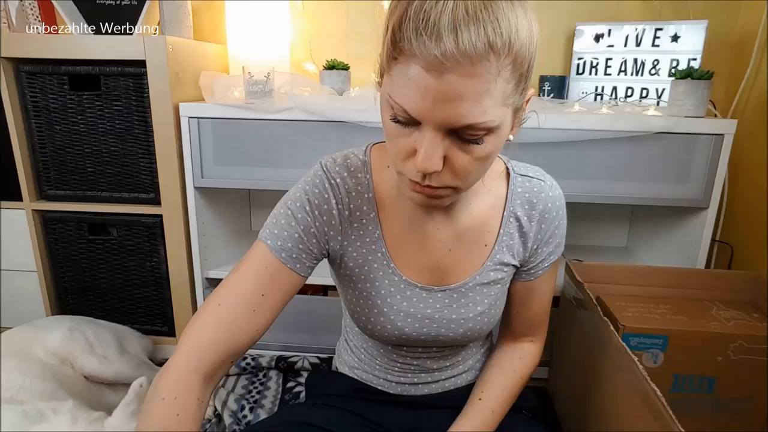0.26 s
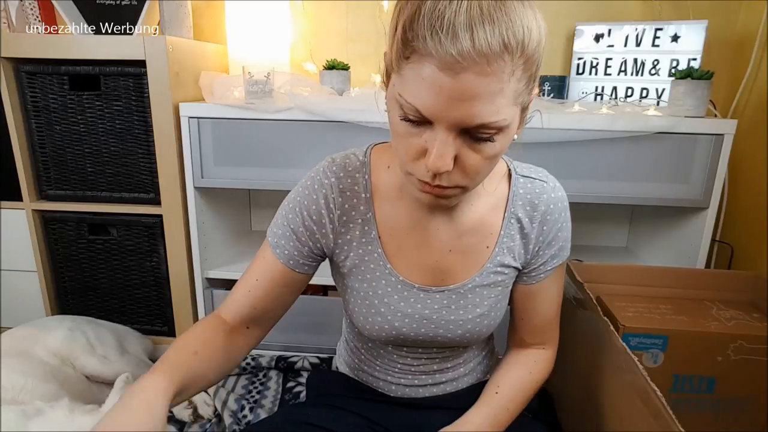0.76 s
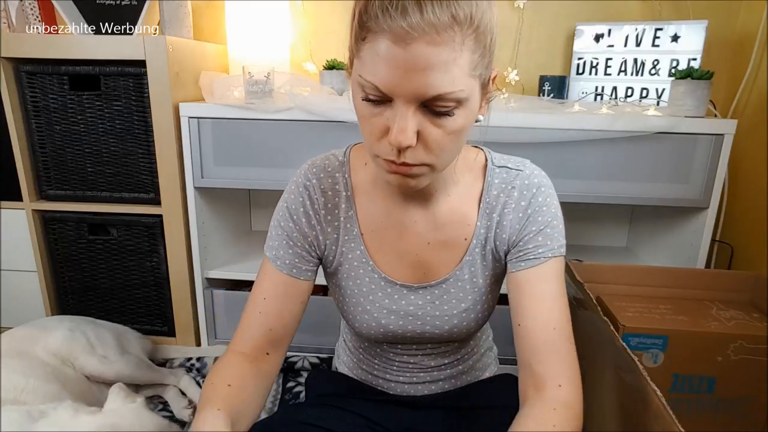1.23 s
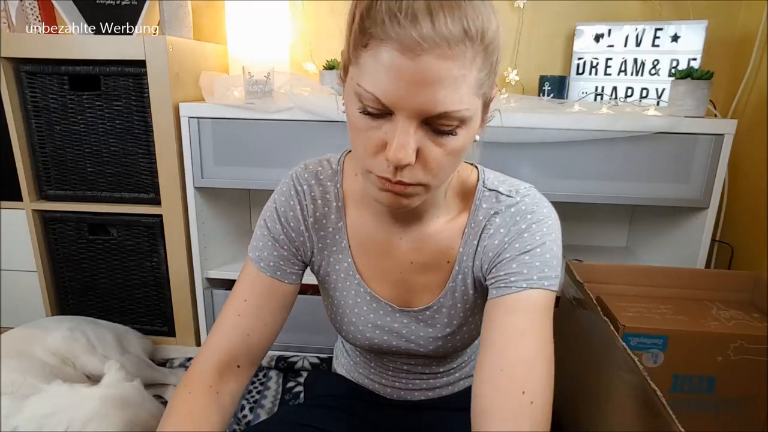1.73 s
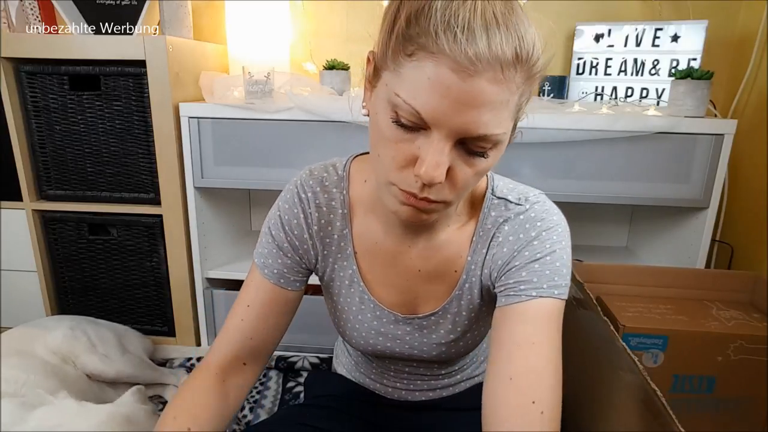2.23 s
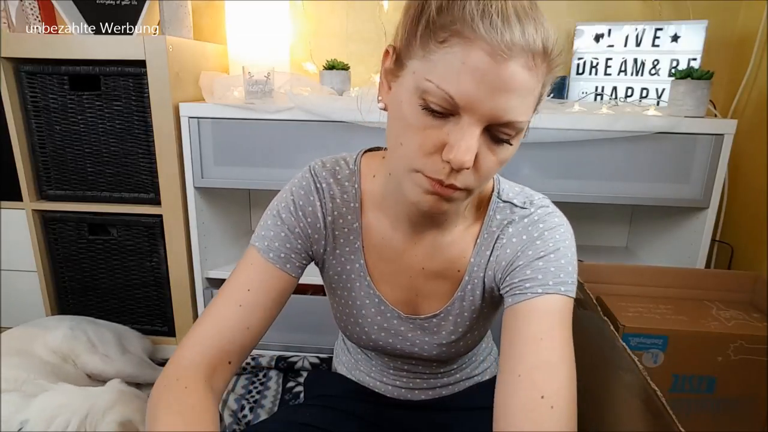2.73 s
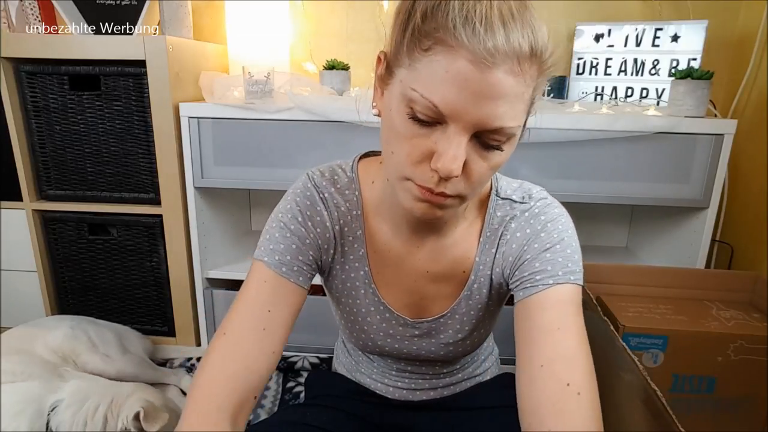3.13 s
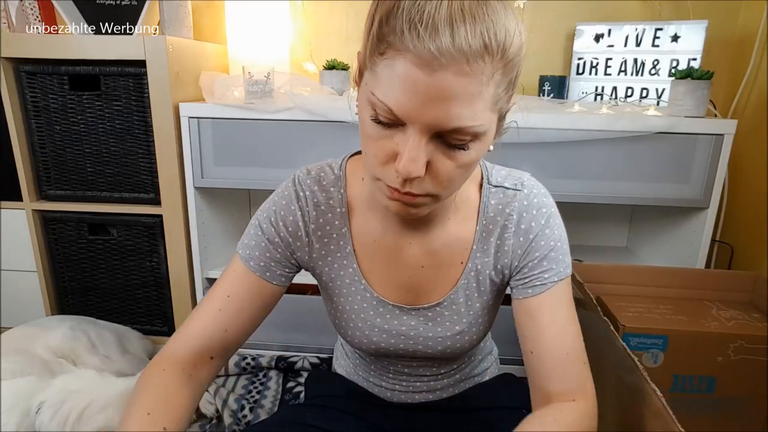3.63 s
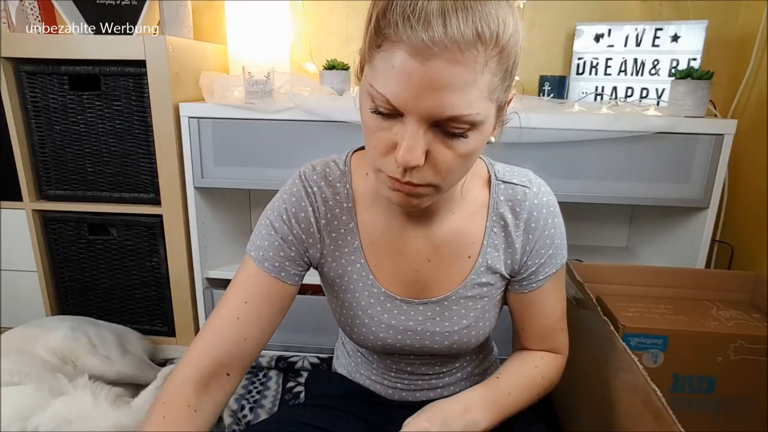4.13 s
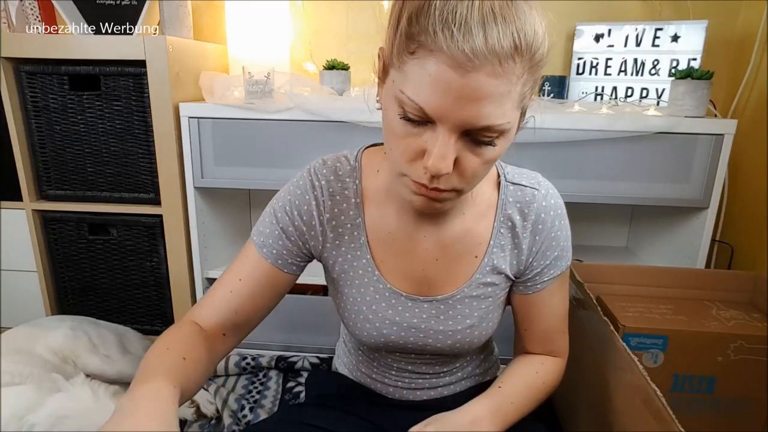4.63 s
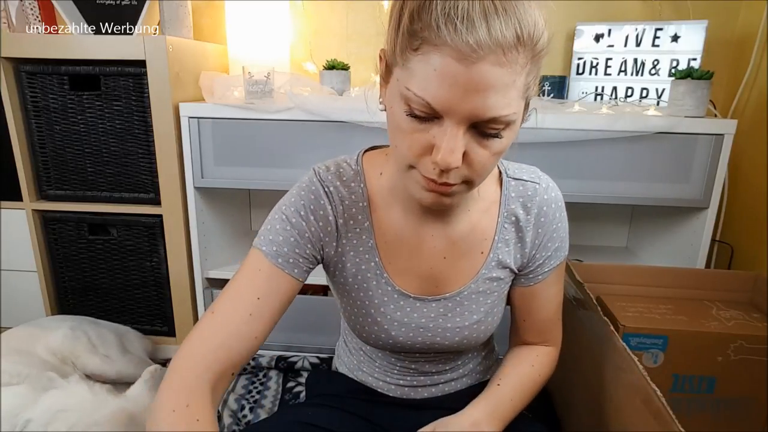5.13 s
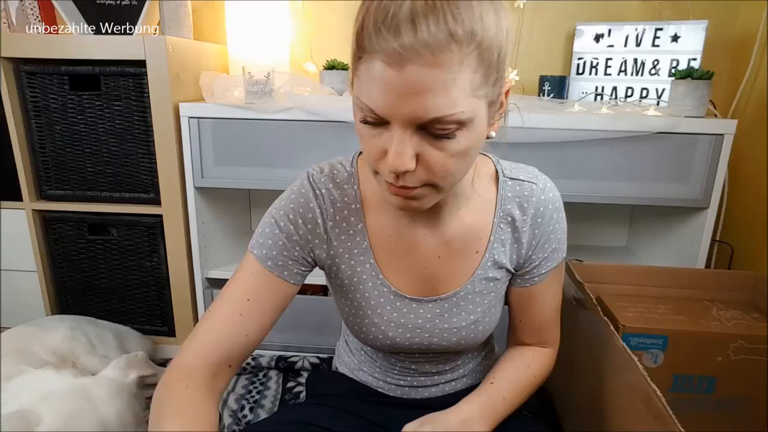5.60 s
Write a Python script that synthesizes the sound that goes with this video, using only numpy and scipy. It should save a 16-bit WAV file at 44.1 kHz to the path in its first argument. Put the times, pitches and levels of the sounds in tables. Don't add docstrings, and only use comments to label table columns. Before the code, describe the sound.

Wet little smacks and ticks give way to sharp cracks, grinding teeth and dull thuds as a dog gnaws a stiff treat.

```python
import sys
import numpy as np
from scipy import signal
from scipy.fft import rfft, irfft, next_fast_len
from scipy.io import wavfile
from scipy.ndimage import map_coordinates

SR = 44100
rng = np.random.default_rng(int(sys.argv[2]) if len(sys.argv) > 2 else 0)


def output_pcm(signal):
    pcm = np.clip(np.atleast_2d(signal).T, -1, 1) * 32767
    wavfile.write(sys.argv[1], SR, np.round(pcm).astype(np.int16))


def ratio_of_db(decibels):
    return 10 ** (np.asarray(decibels, float) / 20)


N = 258408
SPAN = 16384
LONG = next_fast_len(N + 8192)
SPAN_HZ = np.fft.rfftfreq(SPAN, 1 / SR)
LONG_HZ = np.fft.rfftfreq(LONG, 1 / SR)

# [f/Hz, width/Hz, level/dB]
JAW_MODES = [(210, 53.5, -1.5), (330, 36, 0), (390, 31, -1), (509.4, 14, -3), (571.2, 17.4, -1)]
# [f/Hz, width/Hz, level/dB]
FLOOR_MODES = [(67.6, 39.3, 2), (82.4, 23, 4), (109.2, 14, -2)]
# [f/Hz, width/Hz, level/dB]
TREAT_MODES = [(583.5, 20, -10), (700, 66, -12), (846, 46, -12.5), (1000, 117, -10.5), (1123, 23, -8),
               (1540, 150, -14), (1342, 147, -8.5)]
# [f/Hz, level/dB per Hz]
HIDE_SPECTRUM = [(300, -12), (600, -8), (850, -3.5), (1200, -2.5), (1900, -6), (2300, -7.5), (3500, -16),
                 (5000, -26), (8000, -33), (15000, -32)]
# [f/Hz, level/dB per Hz]
CLOTH_SPECTRUM = [(2650, -5), (4500, -5.5), (4910, -7.5), (8190, -10), (9750, -13), (10700, -8),
                  (12300, -9), (15300, -16)]
# [f/Hz, level/dB per Hz]
HISS_SPECTRUM = [(13, -28), (22, -6), (34, -26), (49, -18), (76, -14.5), (227, -12), (394, -18),
                 (783, -20.5), (949, -22), (1090, -22.5), (2850, -28), (7460, -37.5), (14400, -33.5),
                 (15700, -31)]
# [f/Hz, correlation, values below 0 acting as 0]
DOG_ALIKE = [(60, 0.92), (180, 0.98), (550, 0.65), (1650, -0.19), (4970, -0.024), (15000, -0.99)]
# [f/Hz, correlation, values below 0 acting as 0]
ROOM_ALIKE = [(60, -0.13), (240, 0.35), (950, 0.048), (3770, -0.16), (15000, -0.13)]
# [f/Hz, level/dB]
SIDE_LEAN = [(60, -1.5), (240, -0.5), (950, -1), (3770, -2.5), (15000, 1.5)]

# [t/s, peak level/dB, mouth cavity f/Hz, broad crack over cavity ring/dB]
HARD_CRACKS = [(1.962, -34.5, 2040, -5), (1.968, -42, 1860, 3), (1.987, -37.5, 1590, -5),
               (2.051, -43.5, 760, 4.5), (2.099, -45, 1160, 3.5), (2.203, -32.5, 900, -4),
               (2.222, -42, 1020, 11), (2.234, -44.5, 785, 8.5), (2.796, -31.5, 4080, 0),
               (2.7993, -29.5, 900, 1.5), (2.829, -44, 840, 7), (2.859, -32, 2180, -10),
               (2.977, -42, 1370, 8.5), (3.104, -49, 1260, 0), (3.186, -43, 770, -13),
               (3.275, -36.5, 760, 3), (3.312, -29, 700, 1), (3.321, -33, 870, -2),
               (3.333, -30.5, 1300, -17), (3.359, -40.5, 1270, 3), (3.418, -45, 900, 2),
               (3.469, -33.5, 805, -2.5), (3.509, -38.5, 1200, 3), (5.198, -38, 860, -2.5),
               (5.217, -38, 1080, -3.5), (5.361, -48, 800, -11), (5.385, -41, 1290, -7),
               (5.444, -44, 800, 5.5), (5.54, -23, 740, -5.5), (5.55, -36, 945, -2)]
# [t/s, peak level/dB, mouth cavity f/Hz, broad crack over cavity ring/dB]
SOFT_SMACKS = [(.002, -43.5, 1010, -22), (.033, -35, 850, -24), (.049, -43, 850, -28), (.302, -53, 740, 8),
               (.343, -49.5, 940, -5), (.414, -41, 859, -8.5), (.439, -41.5, 865, -5.5),
               (.613, -53.5, 2360, 5.5), (.951, -44.5, 814, -4.5), (1.258, -64, 2500, 7),
               (1.363, -47, 900, -15), (1.403, -54, 915, 6), (1.82, -62, 1364, 9), (1.902, -62, 856, 6),
               (2.389, -52, 1430, -1.5), (5.17, -48, 1860, 4.5)]
# [t/s, peak level/dB, f/Hz, floor thump level/dB]
HARD_KNOCKS = [(1.958, -32, 390, -67.5), (1.968, -33.5, 191, -38), (1.988, -41, 374, -51),
               (2.045, -36, 296, -41.5), (2.097, -37.5, 295, -50.5), (2.204, -38, 440, -36.5),
               (2.221, -29, 337, -41), (2.232, -33.5, 273, -61), (2.796, -33, 304, -65),
               (2.862, -41.5, 294, -77), (2.97, -43, 254.5, -58), (3.098, -37.5, 349, -59),
               (3.187, -37.5, 340, -66), (3.273, -31, 312, -34.5), (3.29, -26.5, 299, -40),
               (3.311, -29.5, 300, -34), (3.335, -28, 337, -42.5), (3.359, -31.5, 322, -57),
               (3.418, -40, 223, -48), (3.468, -30.5, 201, -26.5), (3.488, -28.5, 272, -36),
               (3.51, -28, 173, -38), (5.195, -30, 297, -37.5), (5.216, -27.5, 316, -53),
               (5.37, -29, 257, -39), (5.376, -35, 300, -50), (5.478, -34.5, 345, -45),
               (5.542, -24, 362, -46), (5.551, -24, 358, -44), (5.56, -34.5, 210, -51)]
# [t/s, peak level/dB, f/Hz]
JAW_NUDGES = [(0.031, -48, 440), (0.302, -49, 318), (0.343, -47, 527), (0.412, -41, 332), (.438, -48, 276),
              (0.953, -42, 326), (2.391, -54.5, 570), (3.882, -51.5, 486), (4.138, -45, 192),
              (4.292, -55.5, 348), (4.595, -56.5, 533), (5.052, -54, 300)]
# [t/s, peak level/dB, f/Hz, length/s]
WET_TICKS = [(.003, -54, 9060, 0.031), (.01, -57, 12400, 0.12), (.005, -53, 2460, 0.02),
             (0.421, -57, 2480, 0.042), (0.545, -65, 11600, 0.02), (0.615, -56, 5400, 0.015),
             (0.951, -63, 2450, 0.015), (1.132, -56.5, 7960, 0.0016), (1.133, -56, 12300, 0.015),
             (1.135, -57, 5300, 0.0018), (0.593, -66, 2070, .01), (1.258, -62.5, 6960, 0.0026),
             (1.259, -63, 11000, 0.0044), (1.403, -67, 11400, .03), (1.779, -68, 8800, 0.033),
             (1.815, -62, 9600, 0.014), (1.904, -62, 4330, 0.0024), (2.515, -54, 743, .006),
             (2.52, -59, 1155, 0.0087), (3.813, -49.5, 824, 0.0069), (3.824, -54.5, 1210, 0.0066),
             (3.867, -61, 815, 0.0056), (4.136, -72, 530, 0.0022), (4.291, -58.5, 790, 0.047),
             (4.54, -62.5, 960, .011), (4.74, -54.5, 890, 0.0066), (4.772, -64, 1030, 0.015)]
# [t/s, peak level/dB, f/Hz]
TOOTH_CLICKS = [(1.9595, -50, 3300), (1.988, -49, 4150), (2.203, -56, 2200), (3.275, -49, 2700),
                (3.313, -39, 2700), (3.322, -44, 1300), (2.052, -57, 1500), (2.3, -55, 1440),
                (2.799, -48, 1200), (5.444, -57, 2400), (5.54, -48, 2000), (5.362, -51, 1000),
                (3.47, -47, 1170)]
# [t/s, peak level/dB]
CRUMB_SPRAY = [
    (2.22, -72),
    (2.843, -48),
    (3.275, -55.5),
    (3.47, -58),
    (5.194, -57),
    (5.372, -62),
    (5.54, -46),
    (5.551, -57),
]
# [t/s, peak level/dB, f/Hz]
FIBRE_SNAPS = [(.6145, -57, 3600), (.615, -44.5, 2470), (1.259, -51, 2730), (1.955, -51, 1710),
               (1.9595, -22.5, 2040), (1.97, -29, 2120), (2.005, -46, 1430), (2.0134, -51, 1800),
               (2.0524, -52, 1500), (2.081, -37.5, 1590), (2.098, -47, 1100), (2.134, -50, 3300),
               (2.22, -42, 1300), (2.2235, -28.5, 1990), (2.234, -37, 2290), (2.7387, -56, 1460),
               (2.761, -52, 1604), (2.7995, -23.5, 900), (2.803, -24.5, 900), (2.813, -38, 1100),
               (2.822, -42, 1000), (2.8444, -37, 2120), (2.861, -39, 1100), (2.89, -35, 1900),
               (2.9047, -31, 2000), (2.9594, -38, 1340), (2.985, -41, 1310), (3.0144, -44, 1390),
               (3.1448, -48, 1630), (3.168, -41, 1000), (3.279, -33, 2600), (3.315, -33, 1780),
               (3.323, -28, 746), (3.328, -34, 1290), (3.34, -40, 800), (3.349, -39, 1400),
               (3.3574, -43, 1300), (3.454, -44, 1530), (3.475, -44, 1300), (3.4834, -42, 1320),
               (3.5057, -37, 1690), (3.512, -36, 1190), (3.522, -36, 900), (5.177, -47, 1940),
               (5.218, -34, 900), (5.444, -42, 1360), (5.456, -47, 2400), (5.543, -23, 804),
               (5.547, -42, 2500), (5.555, -26, 1210), (5.576, -39, 1310), (2.8, -32, 3000),
               (2.808, -39, 4500)]
# [t/s, peak level/dB, f/Hz]
TREAT_THUDS = [(.44, -46.5, 250), (2.098, -38.5, 330), (2.764, -53, 298), (2.812, -33, 314),
               (2.849, -42, 330), (3.003, -45, 300), (3.02, -45, 298), (3.288, -36.5, 200),
               (3.419, -33.5, 343), (3.476, -30, 202), (3.4937, -21.5, 272), (4.15, -56, 200),
               (5.217, -31, 330), (5.362, -18.5, 217), (5.3855, -31, 250), (5.395, -38, 240),
               (5.405, -32.5, 238), (5.416, -37, 230), (5.445, -41, 210), (5.545, -29, 330),
               (5.558, -45, 305), (5.25, -40, 342), (5.283, -43, 350), (5.34, -45, 352), (2.205, -40, 400)]
# [t/s, peak level/dB, f/Hz]
SHORT_PINGS = [(.594, -56, 2510), (.594, -66, 5200), (.627, -56, 6200), (.303, -52, 626),
               (1.977, -46, 2067), (1.988, -45, 1410), (2.096, -50, 1600), (2.098, -45, 700),
               (2.204, -46, 1600), (2.231, -46, 2320), (2.797, -33, 2080), (2.808, -37, 1380),
               (2.815, -48, 5500), (2.834, -46, 3900), (2.837, -38, 2530), (2.847, -37, 3680),
               (2.857, -41, 1380), (2.865, -45, 1380), (2.885, -44, 1600), (2.902, -45, 2070),
               (2.914, -43, 1600), (2.985, -42, 2300), (3.158, -49, 1370), (3.17, -49, 1380),
               (3.276, -40, 1750), (3.311, -44, 2760), (3.318, -32, 516), (3.326, -34, 1300),
               (3.336, -40, 1340), (3.339, -54, 3200), (3.346, -32, 585), (3.348, -43, 1750),
               (3.36, -41, 180), (3.37, -44, 1340), (3.431, -45, 590), (3.486, -44, 1340),
               (3.492, -29.5, 433), (3.501, -45, 1380), (3.509, -44, 1040), (3.52, -35, 575),
               (3.532, -35, 258), (3.533, -46, 1350), (3.576, -41.5, 343), (5.176, -47, 430),
               (5.195, -46, 1380), (5.21, -39, 507), (5.244, -34.5, 342), (5.265, -44, 430),
               (5.366, -46, 510), (5.365, -47, 1290), (5.4, -33, 189), (5.538, -36, 765),
               (5.542, -35, 1390), (5.542, -36, 2530), (5.549, -30.5, 199), (5.555, -41, 1140),
               (5.56, -34, 581), (5.571, -41, 1290), (5.581, -36, 191), (5.616, -46, 430)]
# [peak t/s, pressure level/dB, grit over it/dB, 20 dB rise t/s, 20 dB fall t/s]
GRIND_STROKES = [(1.961, -41.5, -0.5, -0.0371, 0.1232), (2.11, -51.5, -1, 0.09, 0.36),
                 (2.227, -40, -6.5, -0.0332, 0.09), (2.37, -68, 8.5, 0.02, 0.11),
                 (2.801, -44.5, 8.5, 0.01, 0.2365), (2.988, -49.5, 6, 0.166, 0.21),
                 (3.142, -53.5, 5, -0.02, 0.33), (3.188, -42.5, -21, 0.09, 0.09),
                 (3.283, -39, -4, 0, 0.1972), (3.326, -35, -4, -0.0047, 0.074),
                 (3.483, -34, -4, 0.0365, 0.113), (5.213, -38.5, -9.5, 0.02, 0.07),
                 (5.361, -39, -9, -0.03, 0.13), (5.46, -47, -4, 0.16, 0.18),
                 (5.546, -26, -11, -0.0224, 0.0578), (5.6, -46, -6, 0.1, 0.14)]
# [peak t/s, pressure level/dB, grit over it/dB, 20 dB rise t/s, 20 dB fall t/s]
LICK_STROKES = [(0.001, -50, -5.5, .02, 0.045), (0.051, -64.5, -1, 0.045, 0.14),
                (.318, -60, -5.5, 0.028, 0.37), (.43, -57.5, -2, 0.12, 0.15), (.86, -79, 8.5, 0.3, .12),
                (2.775, -55, 5.5, 0.051, 0.14), (.632, -64.5, 1, 0.22, 0.11), (.8, -70, -3, 0.44, .5),
                (.95, -58, -18, 0.033, 0.14), (1.19, -91, 6, .3, .3), (1.4, -65, -8, 0.16, 0.1),
                (1.88, -70, -4, 0.21, 0.084), (3.68, -63, -1.5, 0.13, 0.23), (3.92, -64, -11, 0.44, 0.16),
                (4.145, -68, -16, 0.0097, 0.08), (4.31, -64, -11, .04, .5), (4.752, -65, -6, 0.04, 0.24),
                (5.1, -63.5, -11, 0.089, 0.35)]
# [peak t/s, level/dB, 20 dB rise t/s, 20 dB fall t/s]
FLOOR_SWAYS = [
    (0.4, -65.5, 0.2, 0.1),
    (2.13, -63.5, 0.33, 0.75),
    (0.36, -64, 0.1, 0.2),
    (4.16, -60, -0.57, 0.07),
    (3.14, -53.5, -0.02, 0),
    (3.47, -46, 0, 0.12),
    (3.92, -66.5, 0.3, 1.05),
    (4.34, -63, -0.3, 0.2),
    (5.37, -45.5, 0.02, 0.28),
    (5.21, -47, 0.03, -0.2),
]
# [peak t/s, level/dB, 20 dB rise t/s, 20 dB fall t/s]
BEDDING_RUSTLES = [(0.001, -65.5, -7, 0.17), (.15, -77.5, 0.9, 0.9), (.54, -72.5, 0.3, 0.1),
                   (1.19, -73, 0.5, 0.9), (1.88, -77, 0.5, 1.5), (1.96, -76, 0.3, .5),
                   (2.11, -64.5, 0.18, 0.28), (2.226, -57.5, 0.03, 0.08), (2.39, -67.5, 0.5, 0.06),
                   (2.806, -44, 0.04, 0.22), (3.0, -63, 0.23, 0.5), (3.138, -57, 0.04, 0.13),
                   (3.3, -62, -0.03, 0.34), (3.484, -56.5, 0.06, 0.1457), (5.172, -61.5, 0.02, 0.08),
                   (5.212, -62.5, 0.08, 0.12), (5.364, -61, 0.05, 0.36), (5.45, -67, 0.2, 0),
                   (5.544, -60.5, -0.08, 0.13)]
# [rumble, knock, grit, cloth level/dB]
REST_LEVELS = (-85.5, -99, -92.5, -86.5)
# [peak t/s, level/dB, f/Hz, width/Hz, 20 dB rise t/s, 20 dB fall t/s]
FUR_SWISHES = [
    (0.85, -75.5, 1740, 900, 0.26, -0.1),
    (4.33, -73, 700, 450, -0.06, 0.1),
    (0.63, -71, 4200, 2600, 0, 0.1),
    (1.79, -72, 9500, 350, 0, 0.1),
]


def unit(x):
    return x / np.sqrt(np.mean(np.abs(x) ** 2, axis=-1, keepdims=True) + 1e-20)


def along(points, hz):
    f, v = np.transpose(points)
    return np.interp(np.log(hz + 1), np.log(f + 1), v)


def modes(table, f):
    total = 0
    for k, (centre, width, db) in enumerate(table):
        damping = 1j * f * width
        total = total + (-1) ** k * ratio_of_db(db) * damping / (centre * centre - f * f + damping)
    return total


def steep(hz, centre_hz, width_hz):
    return unit(modes([(centre_hz, width_hz, 0)], hz) ** 2)


def causal(gain):
    cepstrum = irfft(np.log(gain + 1e-6))
    half = len(cepstrum) // 2
    cepstrum[1:half] *= 2
    cepstrum[half + 1:] = 0
    return np.exp(rfft(cepstrum))


def half_angle(alike, hz):
    return np.arccos(np.clip(along(alike, hz), 0, 1)) / 2


def spread(pair, alike, hz):
    turn = half_angle(alike, hz)
    mid, side = pair[0] * np.cos(turn), pair[1] * np.sin(turn)
    return np.array([mid + side, mid - side])


def wobble(rate):
    knots = rng.standard_normal(int(N * rate / SR) + 4)
    return map_coordinates(knots, [np.arange(N) * rate / SR])


def grains(response, alike, rate, depth_db):
    noise = ratio_of_db(depth_db * wobble(rate)) * rng.standard_normal((2, N))
    out = irfft(spread(rfft(noise, LONG), alike, LONG_HZ) * response(LONG_HZ), LONG)[:, :N]
    return out / np.sqrt(np.mean(out ** 2))


def swell(s, db, rise_s, fall_s, rest_db):
    step = 32
    late = np.arange(0, N + 2 * step, step)[:, None] / SR - s
    fall_db = 20 * np.maximum(-late / np.maximum(rise_s, .002), late / np.maximum(fall_s, .002))
    gain = np.sqrt((ratio_of_db(db - fall_db) ** 2).sum(1) + ratio_of_db(rest_db) ** 2)
    return np.interp(np.arange(N), np.arange(len(gain)) * step, gain)


def silence():
    return np.zeros((2, N + SPAN))


def add(out, s, body, length, wet_db, pan_db=0):
    t = np.arange(SPAN) / SR
    chance = rng.standard_normal((4, SPAN))
    sparse = np.abs(chance[1]) > 2.5
    snaps = chance[0] * sparse * np.exp(-t / np.clip(length, .0002, .1))
    snaps[0] = -1.25
    tail = chance[2:] * ratio_of_db(-60 * t / 0.24) * (1 - np.exp(-t / 0.00061)) * (t < .3)
    room = 1 + ratio_of_db(wet_db) * spread(rfft(tail / np.linalg.norm(tail[0])), DOG_ALIKE, SPAN_HZ)
    sound = irfft(rfft(snaps / np.linalg.norm(snaps)) * body * room)
    start = round(s * SR)
    out[:, start:start + SPAN] += sound * ratio_of_db([[pan_db / 2], [-pan_db / 2]])


def cracks():
    out = silence()
    hide = unit(causal(ratio_of_db(along(HIDE_SPECTRUM, SPAN_HZ))))
    for events, length, wide in [(HARD_CRACKS, 0.0052, 0.31), (SOFT_SMACKS, 0.01, 0.14)]:
        for s, db, pitch_hz, broad_db in events:
            cavity = steep(SPAN_HZ, pitch_hz, 100 + wide * pitch_hz)
            body = ratio_of_db(db + 9.0) * (ratio_of_db(broad_db) * hide + cavity)
            add(out, s, body, length, wet_db=4.0, pan_db=4.5 * rng.normal())
    return out[:, :N]


def knocks():
    out = silence()
    jaw = unit(modes(JAW_MODES, SPAN_HZ) * modes([(345, 830, 0)], SPAN_HZ))
    floor = unit(modes(FLOOR_MODES, SPAN_HZ) * modes([(82.5, 140, 0)], SPAN_HZ))
    nudges = [(s, db, pitch_hz, db - 23) for s, db, pitch_hz in JAW_NUDGES]
    for s, db, pitch_hz, thump_db in list(HARD_KNOCKS) + nudges:
        skull = 0.73 * unit(jaw * modes([(pitch_hz, 400, 0)], SPAN_HZ))
        knock = ratio_of_db(db + 15.0) * (skull + steep(SPAN_HZ, pitch_hz, 78.4))
        add(out, s, knock + ratio_of_db(thump_db + 22.0) * floor, length=0.00041, wet_db=-1.5)
    return out[:, :N]


def ticks():
    out, events = silence(), []
    for s, db, pitch_hz, length in WET_TICKS:
        blur = min(.6, 9.5 * pitch_hz / length / 53000000.0)
        events.append((s, db, pitch_hz, length, 0.11 + blur))
    events += [(s, db, pitch_hz, 0.0018, 0.23) for s, db, pitch_hz in TOOTH_CLICKS]
    events += [(s, db, 10000, 0.015, 0.64) for s, db in CRUMB_SPRAY]
    for s, db, pitch_hz, length, wide in events:
        add(out, s, ratio_of_db(db + 17) * steep(SPAN_HZ, pitch_hz, 150 + wide * pitch_hz), length, wet_db=3.0)
    return out[:, :N]


def splinters():
    out = silence()
    for s, db, pitch_hz in FIBRE_SNAPS:
        body = ratio_of_db(db + 6.5) * steep(SPAN_HZ, pitch_hz, 200 + 0.35 * pitch_hz)
        add(out, s, body, length=0.00075, wet_db=-3.0, pan_db=3.0 * rng.normal())
    return out[:, :N]


def thuds():
    out = silence()
    for s, db, pitch_hz in TREAT_THUDS:
        ring, soft_contact = modes([(pitch_hz, 88, 0)], SPAN_HZ), modes([(pitch_hz, 486, 0)], SPAN_HZ)
        add(out, s, ratio_of_db(db + 16.0) * unit(ring * soft_contact), length=0.00046, wet_db=-3.5)
    return out[:, :N]


def pings():
    out, t = silence(), np.arange(SPAN // 4) / SR
    opposite = np.array([[1], [-1]])
    for s, db, pitch_hz in SHORT_PINGS:
        chance = rng.standard_normal(2)
        turn = half_angle(DOG_ALIKE, pitch_hz) * np.sign(chance[0]) * opposite
        width_hz = 25 + 0.043 * pitch_hz
        fade = np.exp(-np.pi * width_hz * t) * (1 - np.exp(-t / 0.00051))
        level = ratio_of_db(db + chance[1] * 1.5 * opposite)
        start = round(s * SR)
        out[:, start:start + len(t)] -= level * fade * np.sin(2 * np.pi * pitch_hz * t + turn)
    return out[:, :N]


def crackle():
    snaps = rng.standard_normal(N) * (rng.random(N) < 160 / SR)
    echo = 1 + 0.5 * np.exp(-2j * np.pi * LONG_HZ * np.array([[.0017], [.0026]]))
    hide = causal(ratio_of_db(along(HIDE_SPECTRUM, LONG_HZ)))
    return unit(irfft(rfft(snaps, LONG) * hide * echo, LONG)[:, :N])


def gnawing():
    s, db, grit_db, rise_s, fall_s = np.transpose(list(GRIND_STROKES) + list(LICK_STROKES))
    rumble_rest, knock_rest, grit_rest, cloth_rest = REST_LEVELS
    slips = wobble(30)

    grit = grains(lambda hz: ratio_of_db(along(HIDE_SPECTRUM, hz)), DOG_ALIKE, rate=300, depth_db=1.5)
    grind = swell(s, db + grit_db - 5.0, rise_s, fall_s, grit_rest) * ratio_of_db(1.2 * slips)
    grind = grind * (grit + ratio_of_db(-8.5) * crackle())

    jaw = grains(lambda hz: modes(JAW_MODES, hz) * modes([(316, 5200, 0)], hz), DOG_ALIKE, rate=80, depth_db=1.5)
    knock = swell(s, db - 4.5, rise_s, fall_s, knock_rest) * ratio_of_db(2.0 * slips) * jaw

    pressed = swell(s, db - 24.5, rise_s, 2.1 * fall_s, rumble_rest)
    weight = np.hypot(pressed, swell(*np.transpose(FLOOR_SWAYS), rumble_rest))
    rumble = weight * grains(lambda hz: modes(FLOOR_MODES, hz) * modes([(85.6, 93, 0)], hz),
                             DOG_ALIKE, rate=20, depth_db=1.5)

    cloth = grains(lambda hz: ratio_of_db(along(CLOTH_SPECTRUM, hz)), DOG_ALIKE, rate=820, depth_db=1.5)
    rustle = swell(*np.transpose(BEDDING_RUSTLES), cloth_rest) * ratio_of_db(2.0 + 0.13 * slips) * cloth
    return grind + knock + rumble + rustle


def fur():
    out = 0
    for s, db, pitch_hz, width_hz, rise_s, fall_s in FUR_SWISHES:
        brush = grains(lambda hz: steep(hz, pitch_hz, width_hz), DOG_ALIKE, rate=54, depth_db=1.0)
        out = out + swell(s, db, rise_s, fall_s, rest_db=-120) * brush
    return out


def room_hiss():
    noise = grains(lambda hz: ratio_of_db(along(HISS_SPECTRUM, hz)), ROOM_ALIKE, rate=6.8, depth_db=-0.43)
    return ratio_of_db(-69 + 0.22 * wobble(3.18)) * noise


def scene():
    dog = cracks() + knocks() + ticks() + splinters() + thuds() + pings() + gnawing() + fur()
    bass_cut = modes([(900, 14000, 0.011)], LONG_HZ)
    treat_ring = 1 + modes(TREAT_MODES, LONG_HZ)
    lean_db = along(SIDE_LEAN, LONG_HZ) / 2
    path = bass_cut * treat_ring * ratio_of_db([lean_db, -lean_db])
    return irfft(rfft(dog, LONG) * path, LONG)[:, :N] + room_hiss()


def top_cut(x):
    return signal.sosfilt(signal.butter(12, 15810, fs=SR, output="sos"), x)


def record(dry):
    kept = irfft(rfft(dry, LONG) * (LONG_HZ < 15790), LONG)[:, :N]
    return top_cut(kept - .0004)


dry = scene()
out = record(dry)
output_pcm(out)
```